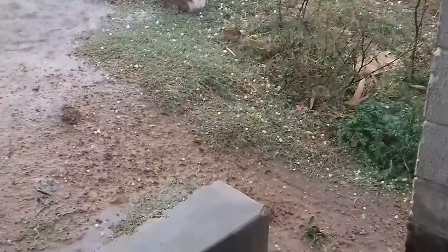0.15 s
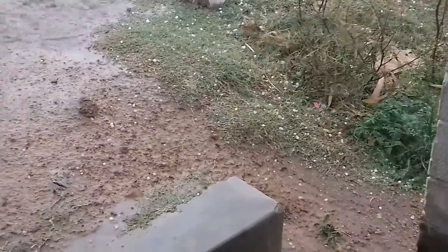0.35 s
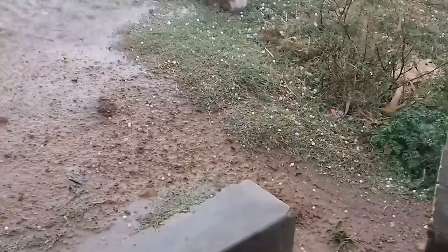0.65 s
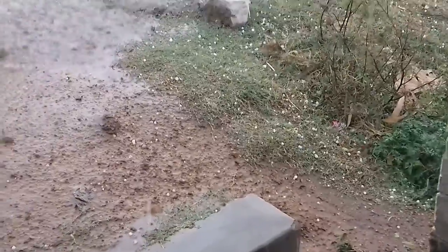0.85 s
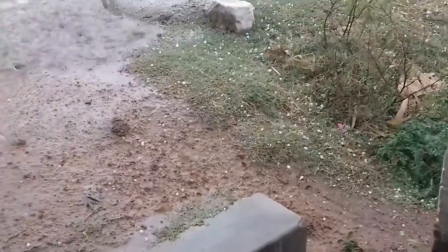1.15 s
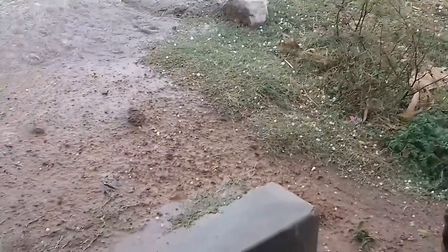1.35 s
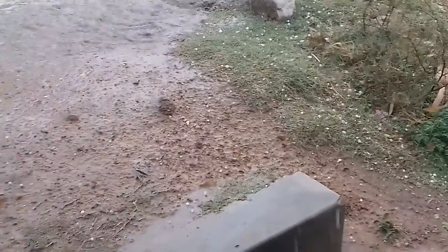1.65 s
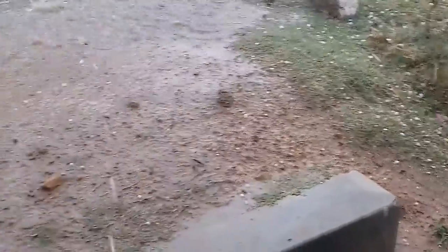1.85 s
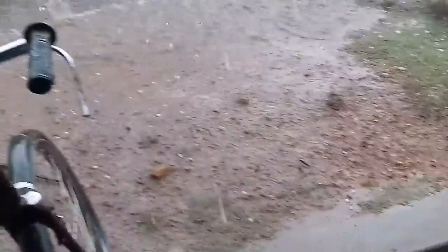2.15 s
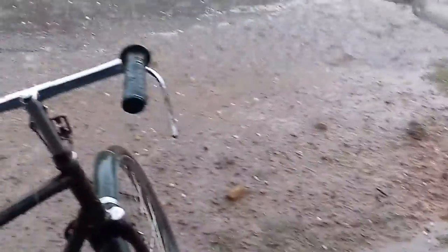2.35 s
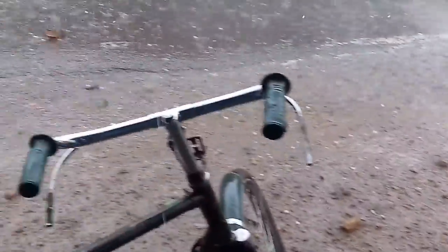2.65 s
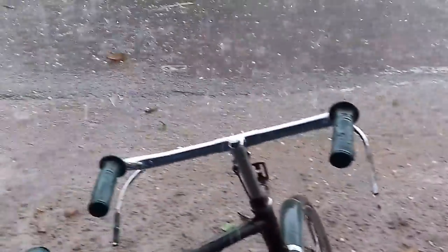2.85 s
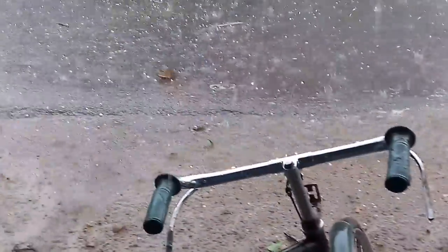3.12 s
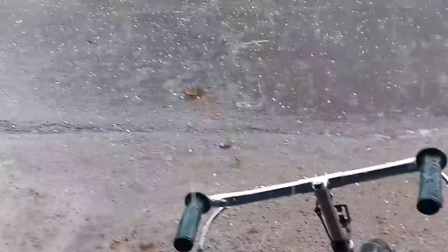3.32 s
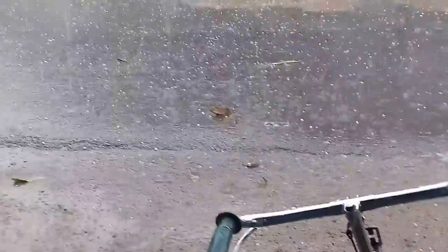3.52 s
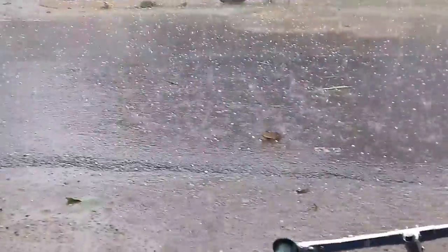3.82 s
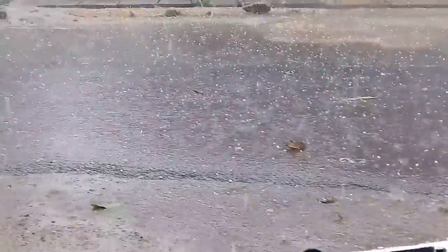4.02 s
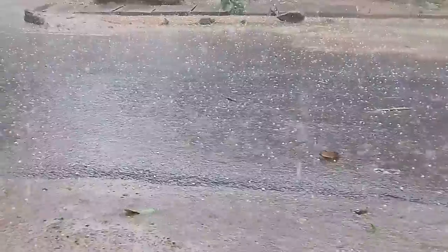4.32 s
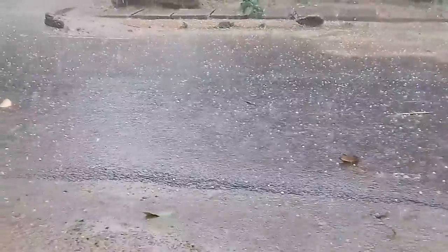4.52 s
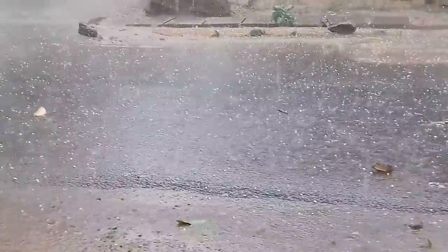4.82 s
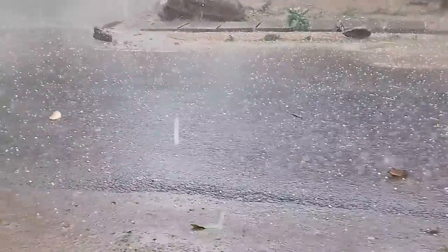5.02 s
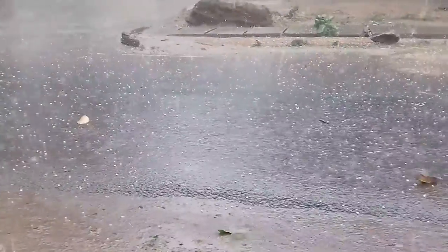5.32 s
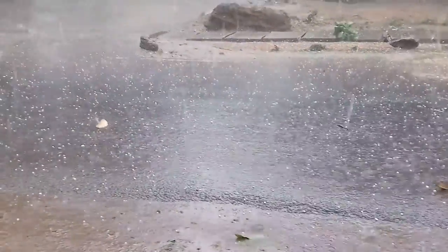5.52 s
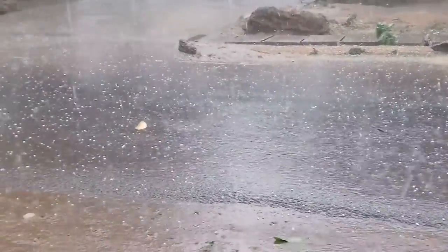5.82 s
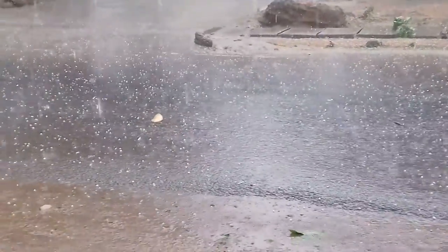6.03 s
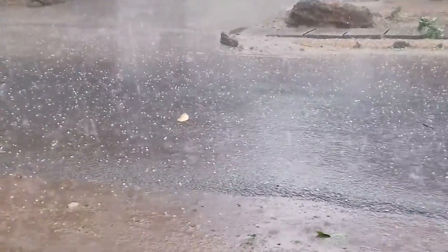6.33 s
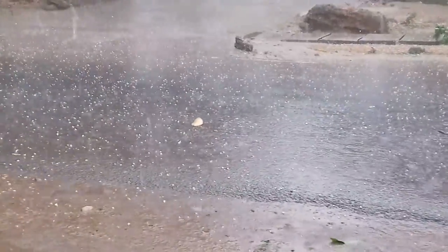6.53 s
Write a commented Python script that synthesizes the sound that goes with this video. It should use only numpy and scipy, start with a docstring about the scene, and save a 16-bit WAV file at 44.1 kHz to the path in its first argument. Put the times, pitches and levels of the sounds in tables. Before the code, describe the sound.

Hail and rain beat on wet concrete, sharp close cracks and dense ticking over a hissing wash that swells, lulls, then returns.

```python
"""Hail and rain beat on wet concrete in front of a porch, heard by a small recorder whose two ports hear alike
except near 8 kHz, where a cavity dulls the left and lifts the right. From the start near stones crack as short
noise bursts, ring at their own pitch and leave a porch tail; small stones patter and pellets tick at random
over a wash of shaped noise. The pour ebbs until about 1.2 s, swells in gusts to a peak near 3 s and slackens by
3.7 s. The heaviest stone lands near 4.15 s, a lull follows until about 5.1 s, then the downpour returns,
strongest near 6.2 s and at the end."""
import sys
import numpy as np
from scipy import signal
from scipy.fft import rfft, irfft, next_fast_len
from scipy.io import wavfile
from scipy.ndimage import uniform_filter1d

SR = 44100
rng = np.random.default_rng(int(sys.argv[2]) if len(sys.argv) > 2 else 0)


def transcribe(u):
    """Save the signal u as a 16-bit wav file named by the first command-line argument.

    u: samples, shape (n,) or (channels, n), limited to [-1, 1]; the rate is SR.
    q: integer samples, one column per channel.
    """
    v = np.clip(np.atleast_2d(u).T, -1, 1)
    q = np.round(v * 32767).astype(np.int16)
    wavfile.write(sys.argv[1], SR, q)


N = 294147  # samples

# Near hailstones; knock and click re level, tail re the usual porch tail:
# [start_s, level_db, knock_db, click_db, pitch_hz, tail_db]
NEAR_STONES = [(0.0112, -5.5, -12.5, -18, 1760, -2), (0.0452, 1, -18, -15, 1790, -1),
               (0.157, -10, -5.5, -22, 1360, -7), (0.2525, -3, -14, -15, 1190, 0),
               (0.3054, -10.5, -20, -13.5, 3780, 6), (0.3967, -9, -8.5, -11, 1420, -4),
               (0.421, -6.5, -18, -12.5, 1430, -4), (0.4998, -6.5, -24, -16, 5350, -10),
               (0.5277, -13, -9, -13, 1550, -4), (0.5601, -11, -23, -18, 4270, -10),
               (0.5774, -15, -16, -16, 4120, -8), (0.6414, -2.5, -17, -15, 1740, -3.5),
               (0.6943, -9.5, -21, -17, 5490, -14), (0.732, -16, -4.5, -13, 1360, -4),
               (0.823, -10.5, -4, -3, 1470, -5.5), (0.9477, -10, -23, -16, 1750, -4),
               (0.972, -12.5, -16, -14, 1890, -1), (1.109, -10.5, -29, -12.5, 4260, 1),
               (1.2989, -4, -20, -16.5, 1250, -4), (1.3096, -7, -6.5, -7, 1340, -5),
               (1.3688, -9.5, -6, -7, 1340, -7), (1.4134, -9.5, -9, -12, 1840, -4),
               (1.4354, -10, -18, -16, 1430, -7), (1.6427, -11, -29, -13, 4090, -4),
               (1.7025, -7, -11.5, -22, 1190, 0), (1.8063, -2, -22, -15, 3930, -10),
               (1.8443, -13, -6, -5, 3800, -9), (1.8858, -9, -5, -13, 1700, -9),
               (1.9083, -10, -20, -7.5, 1840, -9), (1.972, -2.5, -15.5, -15, 1670, -0.5),
               (2.083, -4.5, -16, -15.5, 5270, -1.5), (2.1292, -4.5, -11, -16, 1410, -6),
               (2.2278, -8.5, -16, -18, 1470, -13), (2.271, -5.5, -21, -14, 1510, 6),
               (2.4045, -6.5, -30, -14.5, 2220, 2), (2.436, -7, -18, -10.5, 1850, -4),
               (2.486, -7.5, -14.5, -14.5, 2240, 4), (2.541, -10.5, -9.5, -6, 1490, -12),
               (2.5524, -9.5, -22, -4.5, 5000, -17), (2.607, -2, -17, -13.5, 1320, -7),
               (2.6197, -7, -10, -17, 1660, -4), (2.6978, -14, -9, -18, 1900, -2),
               (2.7345, -4, -15, -13, 2190, 0), (2.7742, -8, -5, -8, 1690, -11),
               (2.796, -3.5, -14, -18, 1410, -1), (2.832, -6, -13, -12, 2060, -7),
               (2.8694, -11, -23, -20, 1450, -4), (2.9001, -5.5, -14, -19, 1280, -3),
               (2.9554, -10, -5.5, -5.5, 1370, 1.5), (3.004, -3.5, -13, -13, 2030, -6),
               (3.0284, -7.5, -22, -12, 1440, 0), (3.0626, -1, -17.5, -10, 4320, 0),
               (3.1974, -8, -18, -12, 1790, -4), (3.2567, -4.5, -20, -16.5, 5380, -1),
               (3.2827, -3.5, -12.5, -10.5, 1680, -2), (3.311, -6.5, -11, -17, 1840, -4),
               (3.3274, -3, -10, -10.5, 1740, -6.5), (3.3514, -6.5, -17, -10, 1860, -4),
               (3.476, -3, -21, -17, 4060, -3.5), (3.5134, -11, -29, -29, 1710, -5.5),
               (3.619, -14, -15.5, -13, 1320, 6.5), (3.7848, -7.5, -36, -17, 5390, -8),
               (3.8206, -3.5, -16.5, -16.5, 4000, 0), (3.928, -17, -14, -3, 3680, -17),
               (4.0544, -10.5, -9, -5.5, 2290, 1), (4.1126, -1.5, -11.5, -10.5, 2760, -8),
               (4.152, 4, -13.5, -16, 2150, -4.5), (4.243, -5, -20, -13, 1730, -5),
               (4.2842, -13.5, -11.5, -13, 1940, -1), (4.334, -10, -15, -20, 2020, 1.5),
               (4.423, -12, -13.5, -18, 1610, -7), (4.5144, -14, -17, -18, 2150, -2),
               (4.555, -12, -21, -16, 1650, -0.5), (4.5996, -12, -19, -18, 5260, -7),
               (4.689, -9.5, -21, -13.5, 4520, -1.5), (4.757, -4, -16.5, -13.5, 4610, -4),
               (4.8469, -16, -11, -10, 1860, 0), (4.907, -13, -14, -12.5, 1530, 1),
               (5.063, -5.5, -15.5, -17, 1810, -2), (5.1284, -20.5, -5.5, -21, 1710, -4),
               (5.1963, -6, -18, -15, 4500, -2), (5.3065, -19, -6, -19, 1330, -8),
               (5.3325, -8.5, -26, -15.5, 3680, -10), (5.4201, -13.5, -8.5, -20, 1880, -3),
               (5.4677, -9, -19, -13.5, 3900, 2), (5.5854, -17, -19, -24, 1370, -2),
               (5.726, -8.5, -13.5, -15, 1730, 2.5), (5.7502, -4, -16.5, -15, 2080, -3.5),
               (5.869, -8, -14, -14, 4520, 2), (5.9727, 1, -20.5, -12.5, 4700, -3),
               (6.0325, -6.5, -16, -17, 1300, 1.5), (6.0602, -6.5, -7, -9, 1530, -7.5),
               (6.1125, -7, -13, -16, 2080, -5), (6.151, -3, -24, -12, 3950, -8),
               (6.1747, -7.5, -10, -8.5, 1790, 1.5), (6.2177, -7.5, -12.5, -22, 1800, 4.5),
               (6.3187, -10.5, -7.5, -23, 1650, -12), (6.4626, -2, -20, -11, 4500, 0.5),
               (6.538, -6.5, -15, -13, 1410, 1.5), (6.5965, -5.5, -16.5, -23, 2110, -7),
               (6.6448, -7, -26, -14, 1560, -2)]
USUAL_BODY_DB = -13  # louder of knock and click, re stone level
SNAP_DB, SPRAY_DB = -10, -23  # re stone level, at the usual body
SNAP_TRADE, SPRAY_TRADE = 0.76, 1  # dB lost per dB of extra body
SPRAY_SCATTER_DB = 7
THUD_DB = -20.5  # re knock


def stone_parts():
    """Levels in dB of snap, knock, click, spray, thud; a stone with more body snaps and sprays less."""
    _, level_db, knock_db, click_db, _, _ = np.transpose(NEAR_STONES)
    extra_db = np.maximum(knock_db, click_db) - USUAL_BODY_DB
    snap_db = SNAP_DB - SNAP_TRADE * extra_db
    scatter_db = SPRAY_SCATTER_DB * rng.standard_normal(len(NEAR_STONES))
    spray_db = SPRAY_DB - SPRAY_TRADE * extra_db + scatter_db
    return level_db + np.array([snap_db, knock_db, click_db, spray_db, knock_db + THUD_DB])


def near_stones(parts_db):
    """Power impulses of the near stones at their moments, one row a part."""
    power = np.zeros((len(IMPACT_PARTS), N))
    starts = np.round(np.transpose(NEAR_STONES)[0] * SR).astype(int)
    power[:, starts] = gain_of(parts_db) ** 2
    return power


# Parts of an impact, rows snap, knock, click, spray, thud; times are t60:
# [low_hz, high_hz, crack_s, porch_s, porch_db]
IMPACT_PARTS = [(5700, 9250, 0.02, 0.26, -9.5), (1040, 2800, 0.016, 0.34, -9.5),
                (3020, 5260, 0.025, 0.24, -12), (9200, 41000, 0.016, 0.084, -11.5),
                (246, 835, 0.082, 0.54, -6.5)]
# First echoes off step and pillars: [delay_s, level_db]
WALL_ECHOES = [(.0037, -12.5), (.0085, -10), (0.0122, -11)]
PORCH_RISE_S = 0.014  # time constant


def impacts(direct, fed):
    """Noise bursts: each part cracks fast and echoes off the walls; the porch adds a diffuse tail."""
    t = np.arange(SR // 2) / SR
    cracks, tails = np.zeros(N), np.zeros(N)
    for power, feed, part in zip(direct, fed, IMPACT_PARTS):
        low_hz, high_hz, crack_s, porch_s, porch_db = part
        rise = 1 - np.exp(-t * low_hz / 4.1)  # a few cycles of the lowest pitch
        blow = rise * gain_of(-60 * t / crack_s) ** 2
        echoes = sum(gain_of(db) ** 2 * np.interp(t - delay_s, t, blow) for delay_s, db in WALL_ECHOES)
        blow = blow + echoes
        tail = gain_of(porch_db - 60 * t / porch_s) ** 2 * (1 - np.exp(-t / PORCH_RISE_S))
        crack_gain = np.sqrt(abs(signal.fftconvolve(power, blow / blow.max())[:N]))
        tail_gain = np.sqrt(abs(signal.fftconvolve(feed, tail)[:N]))
        cracks += crack_gain * steady(hiss(low_hz, high_hz), low_hz)
        tails += tail_gain * hiss(low_hz, high_hz)
    return cracks + patchy(tails, patchy_db=2.5)


RING_DB, RING_CYCLES = 2, 45  # re its part; cycles to -60 dB
RING_SAMPLES = 1200


def ring(hz, cycles):
    """A dying sine with a soft first cycle."""
    turns = np.arange(RING_SAMPLES) / SR * hz
    envelope = (1 - np.exp(-turns / 0.72)) * gain_of(-60 * turns / cycles)
    return envelope * np.sin(2 * np.pi * turns)


def rings(parts_db):
    """Each near stone sounds the pitch of the spot it strikes, low with its knock, high with its click."""
    out = np.zeros(N + RING_SAMPLES)
    knock_top_hz = IMPACT_PARTS[1][1]
    for stone, (_, knock_db, click_db, _, _) in zip(NEAR_STONES, parts_db.T):
        start_s, pitch_hz = stone[0], stone[4]
        part_db = knock_db if pitch_hz < knock_top_hz else click_db
        tone = gain_of(part_db + RING_DB) * ring(pitch_hz, RING_CYCLES)
        out[round(start_s * SR):][:RING_SAMPLES] += tone
    return out[:N]


PATTER_PER_S, PATTER_SPREAD_DB, PATTER_DB = 200, 5, -12  # level re pour, before size, colour and part


def patter():
    """Power impulses of small stones at random moments, one row a part; each stone has its own colour."""
    lands = rng.random(N) < PATTER_PER_S / SR
    size_db = PATTER_SPREAD_DB * np.minimum(rng.exponential(1, N), 2.2)
    colour_db = 4.7 * rng.standard_normal((len(IMPACT_PARTS), N))
    part_db = np.array([[-4.], [-6.], [-7.], [-17.], [-19.]])
    return lands * (pour() * gain_of(PATTER_DB + size_db + colour_db + part_db)) ** 2


TICKS_PER_S, TICKS_SPREAD_DB, TICKS_DB = 600, 3.5, -12.5  # level re pour


def ticks():
    """Pellets skip on the slab: short tones at random moments, each with one of many pitches."""
    lands = rng.random(N) < TICKS_PER_S / SR
    size = lands * gain_of(TICKS_SPREAD_DB * np.minimum(rng.exponential(1, N), 3.0))
    pitches_hz = np.geomspace(1100, 13000, num=24)
    which = rng.integers(0, len(pitches_hz), N)
    # small pellets favour the treble
    tone_db = yard_colour_db(pitches_hz) + 7.4 * np.log2(pitches_hz / 4000)
    pellets = np.zeros(N)
    for k, hz in enumerate(pitches_hz):
        hits = size * (which == k)
        pellets += gain_of(tone_db[k]) * signal.oaconvolve(hits, ring(hz, cycles=19.0))[:N]
    return gain_of(TICKS_DB) * pour() * evened(pellets)


# Strength of the downpour, before each layer's own trim: [time_s, strength_db]
POUR_STRENGTH = [(0.0, -21), (1.17, -23), (1.65, -21.5), (1.97, -19.5), (2.36, -21.5), (2.95, -16.5),
                 (3.08, -20), (3.68, -23.5), (4.07, -19), (4.36, -27.5), (4.55, -29), (4.7, -28),
                 (5.09, -29.5), (5.83, -23.5), (6.15, -17.5), (6.32, -20), (6.48, -22), (6.67, -18.5)]
POUR_REF_DB = -22


def pour(level_db=POUR_REF_DB, share=1):
    """Gain of a layer that follows a share of the swell; level_db holds at reference strength."""
    strength_db = np.interp(np.arange(N) / SR, *np.transpose(POUR_STRENGTH))
    return gain_of(level_db + share * (strength_db - POUR_REF_DB))


# levels at reference strength, before the wash trim; share of the swell each follows
RUMBLE_DB, RUMBLE_SHARE, MIST_DB, MIST_SHARE = -40, 0.88, -33, 0.67
WASH_TRIM_DB = -4.5


def wash():
    """Countless far impacts blend into smooth noise, in three bands."""
    middle = pour() * hiss(990, 10800)
    rumble = pour(RUMBLE_DB, RUMBLE_SHARE) * hiss(20, 875)
    mist = pour(MIST_DB, MIST_SHARE) * hiss(10800, 21000)
    return gain_of(WASH_TRIM_DB) * patchy(middle + rumble + mist, patchy_db=2.0)


# Colour of ground and microphone together, relative spectral density: [freq_hz, level_db]
YARD_COLOUR = [(20, -60), (45, -36), (108, -10), (263, -11.5), (476, -14), (962, -6.5), (1370, -2.5),
               (1840, -2.5), (2910, -8.5), (4140, -2), (5140, -4.5), (7110, 1), (9320, -4.5), (10800, -12),
               (15800, -19.5)]


def yard_colour_db(hz):
    """Colour of the yard, interpolated over log frequency."""
    freq_hz, level_db = np.transpose(YARD_COLOUR)
    return np.interp(np.log(hz), np.log(freq_hz), level_db)


def hiss(low_hz, high_hz, steep=5.4):
    """White noise shaped by the yard colour between two soft edges, rms 1."""
    size = next_fast_len(N)
    hz = np.fft.rfftfreq(size, 1 / SR) + 1  # +1 avoids zero
    low_edge = 1 + (low_hz / hz) ** (2 * steep)
    high_edge = 1 + (hz / high_hz) ** (2 * steep)
    white = rfft(rng.standard_normal(size))
    shaped = white / np.sqrt(low_edge * high_edge) * gain_of(yard_colour_db(hz))
    return evened(irfft(shaped)[:N])


def patchy(x, patchy_db):
    """Random patches of a few hundred Hz by a few tens of ms, louder or softer."""
    z = signal.stft(x, nperseg=512, noverlap=384)[2]
    patches = uniform_filter1d(rng.standard_normal(z.shape), size=5, axis=0)
    patches = evened(uniform_filter1d(patches, size=12, axis=1))
    return signal.istft(z * gain_of(patchy_db * patches), nperseg=512, noverlap=384)[1][:N]


def steady(x, cycles_hz):
    """Evens out the chance swells of a noise, so that each crack keeps the strength of its blow."""
    power = uniform_filter1d(x ** 2, size=int(SR / cycles_hz) * 4)
    return x / np.sqrt(abs(power) + 0.21)


def gain_of(db):
    """Decibels to an amplitude factor."""
    return 10 ** (np.asarray(db) / 20)


def evened(x):
    """Scaled to rms 1."""
    return x / np.sqrt(np.mean(x ** 2) + 1e-20)


# Brief fades of the whole level, back at once at the end: [end_s, length_s, depth_db]
LEVEL_DIPS = [(0.057, 0.009, -1), (2.608, 0.010, -7), (3.061, 0.017, -9), (4.1535, 0.063, -10)]


def level_dips():
    """Gain that slides down to each depth, then jumps back."""
    t = np.arange(N) / SR
    fade_db = np.zeros(N)
    for end_s, length_s, depth_db in LEVEL_DIPS:
        fade_db += depth_db * np.clip(1 - (end_s - t) / length_s, 0, 1) * (t < end_s)
    return gain_of(fade_db)


STONE_TAIL_DB = 5.5  # porch feed of near stones re small ones, before tail_db


def scene():
    """Stones, rings, ticks and wash reach both ports alike."""
    parts_db = stone_parts()
    tail_db = np.transpose(NEAR_STONES)[-1]
    direct = near_stones(parts_db)
    fed = near_stones(parts_db + STONE_TAIL_DB + tail_db)
    small = patter()
    stones = impacts(direct + small, fed + small)
    yard = level_dips() * (stones + rings(parts_db) + ticks() + wash())
    return np.array([yard, yard])


# Cavity that dulls the left port and lifts the right: [pitch_hz, width_hz, level_db]
PORT_CAVITY = (8030, 700, -7.5)
LOW_CUT_HZ, EDGE_HZ = 45, 15850
CEILING = 1.05  # tanh limit, full scale = 1


def record(dry):
    """The port cavity parts the channels near its pitch; peaks are rounded; then the band limits."""
    pitch_hz, width_hz, level_db = PORT_CAVITY
    peak = signal.iirpeak(pitch_hz, pitch_hz / width_hz, fs=SR)
    cavity = gain_of(level_db) * signal.lfilter(*peak, dry[0])
    ports = dry + np.array([[-1], [1]]) * cavity
    rounded = CEILING * np.tanh(ports / CEILING)
    low_cut = signal.butter(2, LOW_CUT_HZ, "highpass", fs=SR, output="sos")
    top_cut = signal.firwin(511, EDGE_HZ, window=("kaiser", 9), fs=SR)
    return signal.oaconvolve(signal.sosfilt(low_cut, rounded), top_cut[None], "same")


dry = scene()
out = record(dry)
transcribe(out)
```